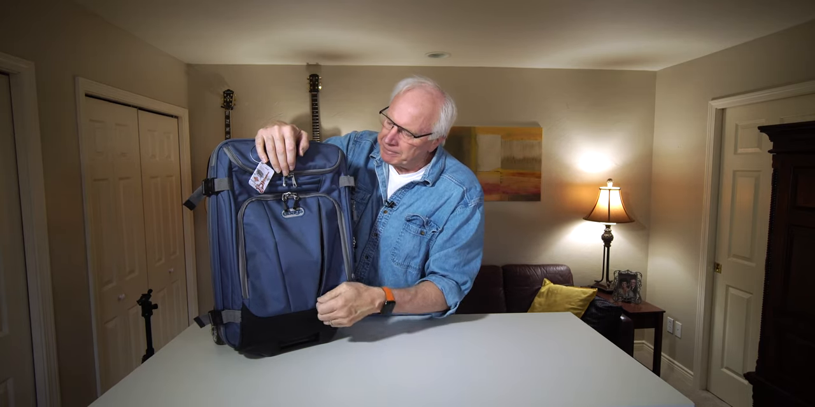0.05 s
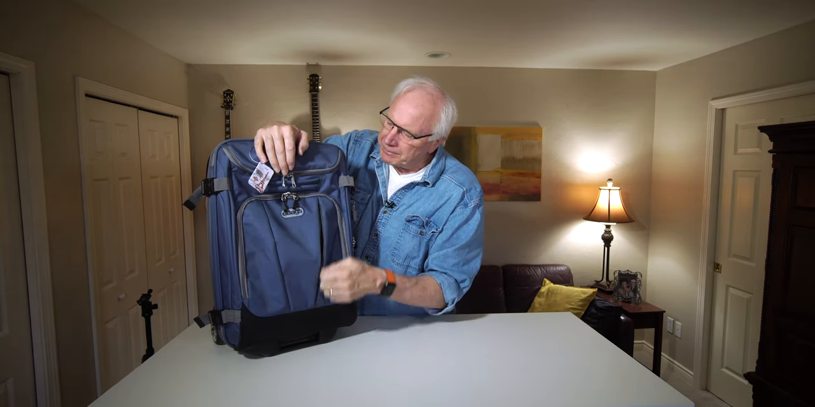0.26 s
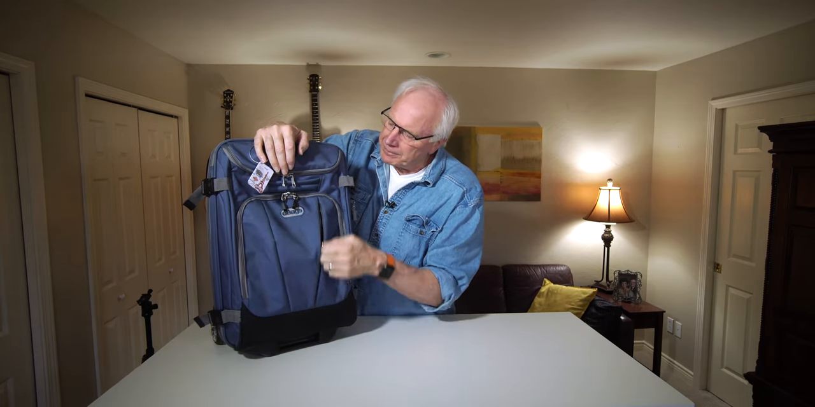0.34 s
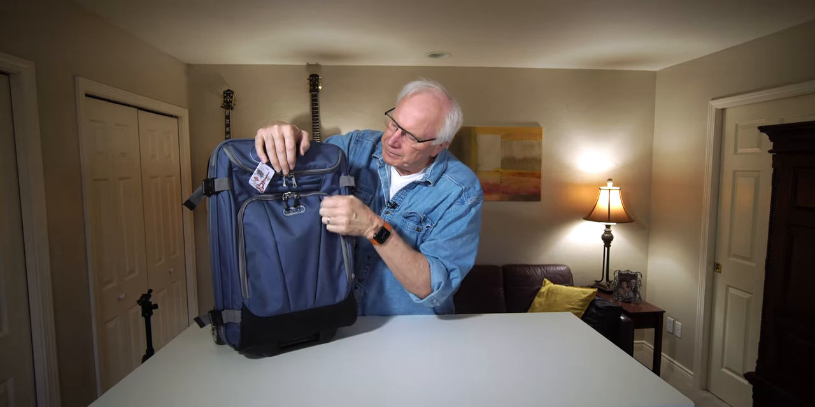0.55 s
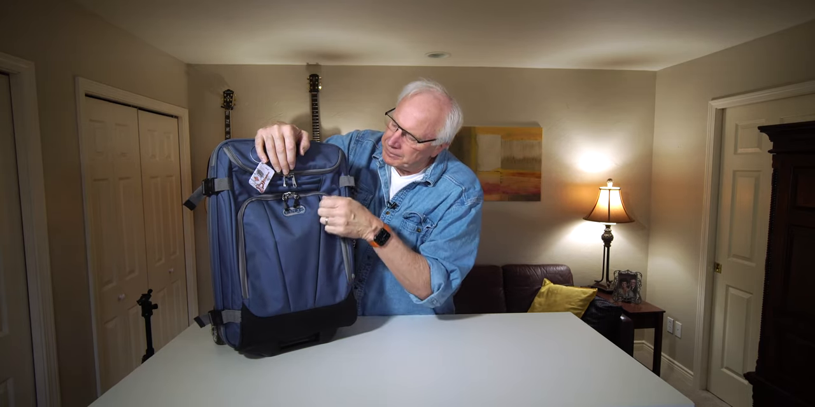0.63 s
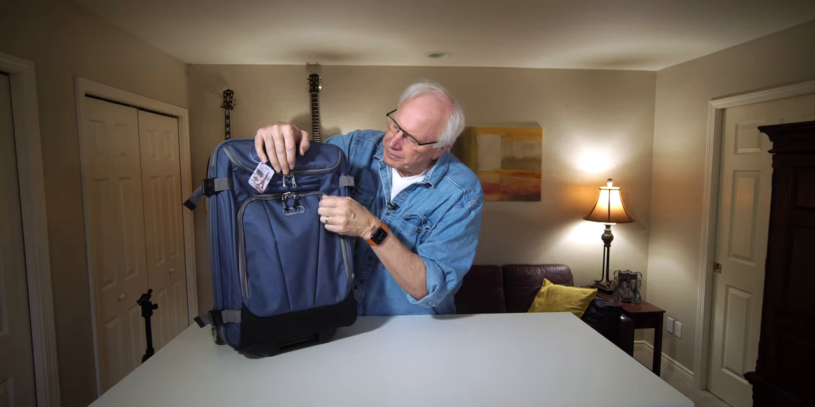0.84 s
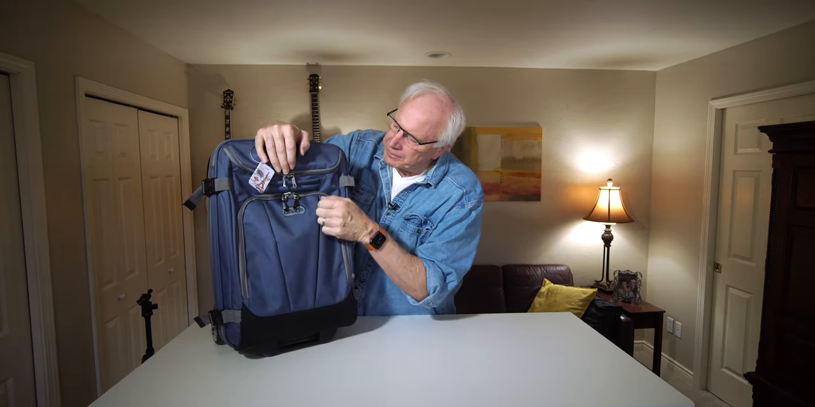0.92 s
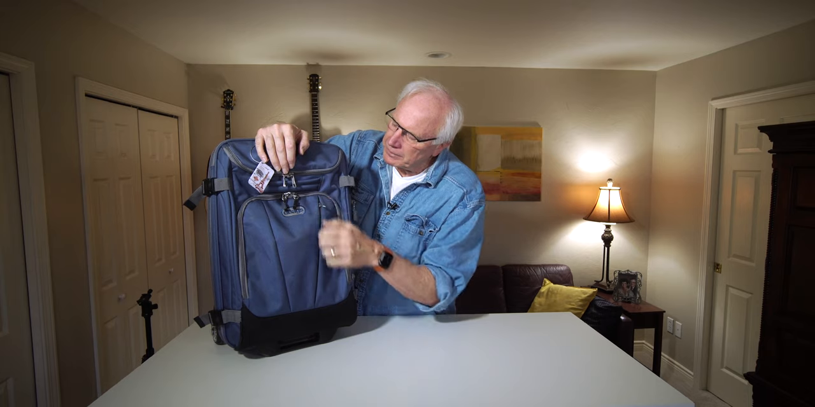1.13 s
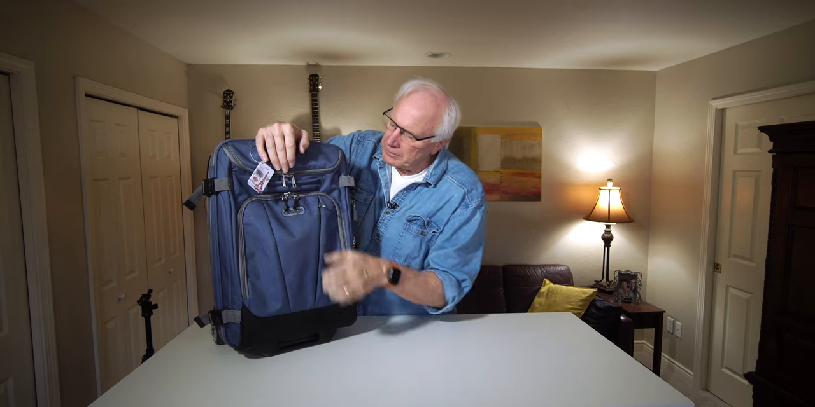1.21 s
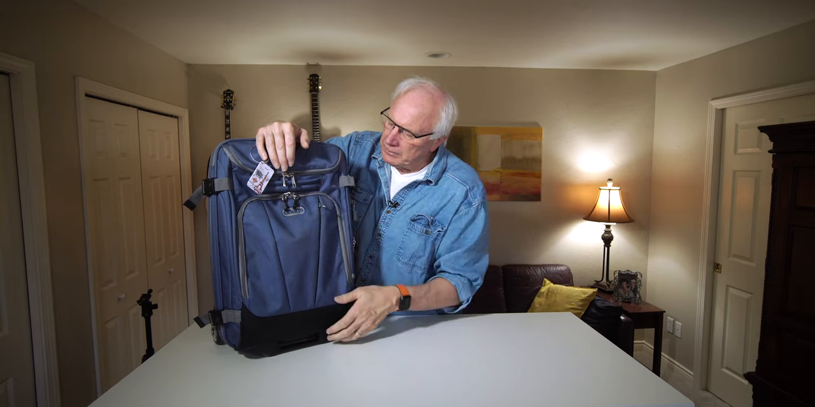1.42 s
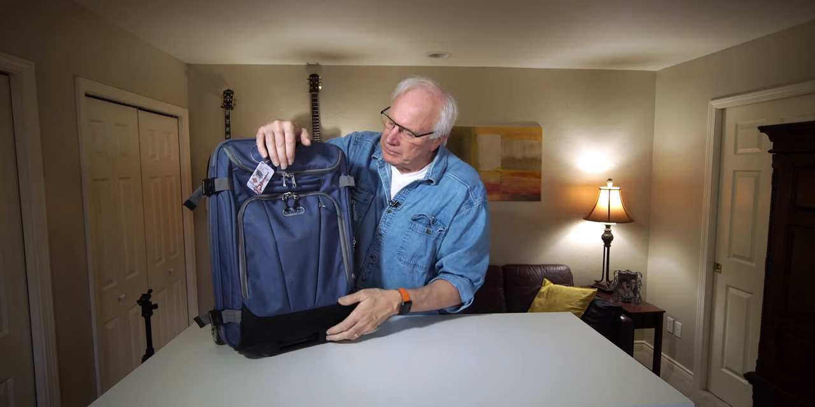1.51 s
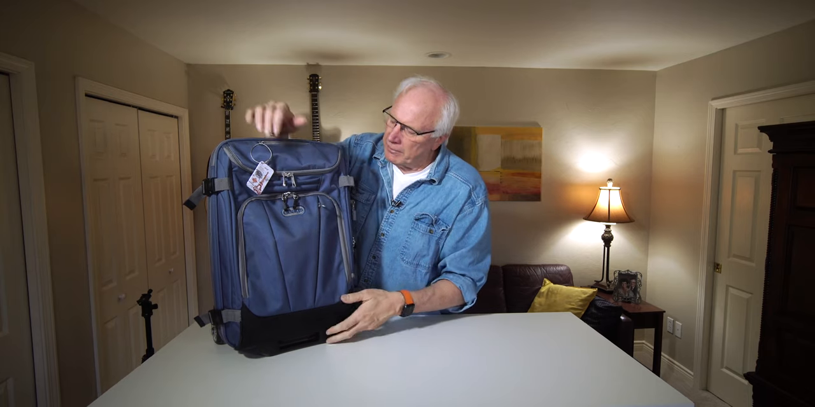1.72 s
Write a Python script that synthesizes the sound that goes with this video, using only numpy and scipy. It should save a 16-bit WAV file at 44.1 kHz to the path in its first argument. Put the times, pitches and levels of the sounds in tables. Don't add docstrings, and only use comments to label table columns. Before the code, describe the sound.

A zipper on a fabric bag: a few separate tooth clicks from 0.15 seconds, then a fast, uneven, hollow buzzing zip from 0.23, slowing and stumbling to a stop near 0.65. A bright pull-tab tick at 0.74 and faint rustling follow. From 1.27 come soft taps, knocks, hand strokes, sleeve rustle and pats until 1.8. Quiet, short-tailed room; close clip-on microphone, low cable thumps, rumble and light hiss.

```python
import sys
import numpy as np
from scipy import signal
from scipy.fft import rfft, irfft, next_fast_len
from scipy.io import wavfile
from scipy.ndimage import uniform_filter1d, map_coordinates

SR = 44100
rng = np.random.default_rng(int(sys.argv[2]) if len(sys.argv) > 2 else 0)


def store_pcm(level_fs):
    pcm = np.round(np.clip(level_fs, -1, 1) * 32767).astype(np.int16)
    wavfile.write(sys.argv[1], SR, np.atleast_2d(pcm).T)


def gain_from_db(level_db):
    decades = np.asarray(level_db, float) / 20
    return 10 ** decades


N = 77175

# (time [s], tooth rate [1/s], pull level [dB], looseness [0-1])
SLIDER_RUN = [
    (.233, 688, -42.5, 0.11),
    (.262, 660, -40, 0.16),
    (.285, 580, -40, 0.11),
    (.322, 770, -40.5, 0.17),
    (.345, 870, -38.5, .1),
    (.45, 837, -41, 0.13),
    (.5, 860, -43, 0.2),
    (.548, 550, -41.5, 0.18),
    (.615, 294, -47, 0.33),
]
STOP_S, STOP_T60_S = .645, .12
# (time [s], length [s], gain [dB], held pitch [Hz], 0 = free)
MODE_LOCKS = [(.235, .021, 5, 685), (.259, .007, 4, 740), (.276, .011, 5, 610), (.29, .012, 4, 590),
              (.304, .005, -10, 0), (.312, .017, 12, 695), (.333, .004, 4, 790), (.347, .003, -10, 0),
              (.352, .004, 7, 885), (.386, .01, 8, 845), (.399, .017, 6, 865), (.417, .003, -10, 0),
              (.422, .004, 5, 870), (.432, .008, 7, 880), (.441, .002, -10, 0), (.445, .008, 3, 860),
              (.479, .006, 3, 885), (.487, .003, -8, 0), (.506, .014, 8, 770), (.522, .017, 8, 730),
              (.545, .012, 4, 530), (.541, .001, -10, 0), (.56, .052, -22, 0), (.614, .011, 3, 310),
              (.629, .011, 5, 285), (.647, .006, 5, 290)]
# (time [s], peak level [dB])
TOOTH_SLIPS = [
    (0.152, -39.5),
    (0.18, -39.5),
    (0.194, -39),
    (0.207, -33.5),
    (0.222, -31),
    (0.235, -41),
]
# (frequency [Hz], level [dB], T60 [s])
SLIP_PARTIALS = [(350, -2.5, 0.047), (668, 4, 0.019), (1346, -15.5, 0.016)]
# (time [s], peak level [dB], pitch [Hz], T60 [s])
STUMBLES = [(.543, -49, 748.3, 0.082), (.566, -44, 492, 0.044), (.572, -43.5, 259, 0.067),
            (.578, -44, 864, 0.027), (.592, -46, 707, 0.066), (.6, -48, 530, 0.055),
            (.603, -50, 353.5, 0.043), (.612, -59, 810, 0.024), (.631, -53, 680, 0.036),
            (.66, -53.5, 350, 0.073), (.694, -53.5, 327, 0.042)]
# (time [s], pitch [Hz], level [dB])
TAPE_FLAP = [
    (.233, 351.8, -55),
    (.285, 294, -47.5),
    (.33, 327.5, -59),
    (.36, 464.6, -49),
    (.4, 436.6, -44),
    (.438, 391.7, -43.5),
    (.465, 382.5, -49),
    (.498, 400, -47),
    (.515, 390, -80),
]
# (centre [Hz], width [Hz], level [dB])
PANEL_MODES = [(359, 48, 3.5), (518, 54, -3), (708, 66, 5), (852, 500, 0.5), (1380, 330, -0.5),
               (1950, 480, -17.5), (3330, 1700, -16.5)]
PANEL_TOP_HZ = 4130
# (frequency [Hz], density [dB/Hz])
SCRAPE_SPECTRUM = [(1500, -2), (2200, -4), (4000, -13), (5200, -10.5), (6900, -7), (8500, -12.5),
                   (12000, -22.5), (16000, -27)]
# (time [s], level [dB])
SCRAPE_EFFORT = [
    (0.14, -73),
    (0.15, -71.5),
    (0.374, -51.5),
    (0.534, -53),
    (0.556, -58),
    (0.626, -59),
    (0.696, -80.5),
    (0.72, -70),
]
# (frequency [Hz], density [dB/Hz])
DRAG_SPECTRUM = [(15, -20), (40, -2), (90, -8), (150, -8), (200, -12), (280, -2), (450, -12), (900, -60)]
SNAG_DB, SNAG_RATE_HZ, KICK_SPREAD_DB = 4, 170, 2
OVERTONE_DB, RATTLE_DB, DRAG_DB = -37, -11.5, -32.5
TWIN_RATIO, TWIN_DB, TWIN_FROM_HZ = 1.08, -6, 780
SLIP_DB, CRACK_DB, CRACK_T60_S, SCRAPE_GATE = -5.5, -23.5, 0.017, 0.2
# (start [s], rise [s], fall [s], level [dB], pitch [Hz])
HAND_SLIDES = [
    (1.466, .01, .12, -63, 1500),
    (1.47, .018, .065, -67.5, 3000),
    (1.52, .04, .06, -64, 1480),
    (1.535, .035, .045, -66, 2780),
]
SLIDE_WIDTH_HZ = 750
# (start [s], rise [s], fall [s], level [dB])
RUSTLES = [
    (.74, 0.02, 0.041, -67),
    (.79, 0.024, 0.17, -69.5),
    (.96, 0.087, 0.056, -69),
    (1.48, 0.18, 0.6, -62),
]
# (frequency [Hz], density [dB/Hz])
CLOTH_SPECTRUM = [(400, -3), (1600, -0.5), (3800, -10), (6500, -1), (8500, -5), (12000, -15.5),
                  (16000, -13)]
# (start [s], rise [s], fall [s], level [dB])
PATS = [
    (1.369, 0.0051, 0.0324, -64),
    (1.266, 0.00175, 0.013, -68),
    (1.8, 0.0023, 0.071, -66),
    (1.598, 0.0146, 0.14, -65),
    (1.733, 0.0026, 0.03, -57),
]
# (frequency [Hz], density [dB/Hz])
PAT_SPECTRUM = [(200, -1.5), (500, 1), (1250, -3.5), (2600, -11), (4000, -23), (7000, -16), (16000, -66)]
# (time [s], peak level [dB], pitch [Hz], T60 [s])
TICKS = [(.026, -63.5, 5860, 0.008), (.736, -40, 6130, 0.0029), (.736, -53, 3650, 0.0038),
         (.736, -59.5, 11200, 0.0011), (.736, -70, 1860, 0.0064), (1.27, -61.5, 6500, 0.0079),
         (1.448, -44.5, 680, 0.01), (1.448, -56.5, 3460, 0.0037), (1.472, -58.5, 3030, 0.0051),
         (1.515, -42, 1090, 0.0035), (1.544, -52.5, 4140, 0.0036), (1.65, -69, 6500, .004),
         (1.738, -61, 1190, 0.067), (1.738, -59, 2530, 0.011), (1.738, -57, 3600, 0.0071),
         (.615, -49.5, 180, 0.13), (.51, -52, 216, 0.042), (.736, -62, 14500, .001),
         (.736, -63, 8260, .002), (1.376, -56.5, 2380, 0.0047), (1.27, -59, 1600, .006),
         (1.27, -61, 603, 0.0065), (1.298, -59, 770, 0.011), (1.378, -59.5, 1000, .005),
         (1.472, -62, 5250, 0.0061), (1.544, -64, 6640, 0.0044), (.527, -49, 1500, 0.043),
         (1.446, -61, 1650, 0.0108), (1.515, -56, 750, 0.014), (1.563, -58.5, 720, 0.017),
         (1.1, -61, 676, 0.027), (.151, -60, 2980, 0.007), (.178, -60, 2940, 0.0027),
         (.193, -44, 2520, 0.0016)]
# (time [s], peak level [dB], pitch [Hz], T60 [s])
THUMPS = [(.058, -60.5, 166, 0.083), (.485, -46, 46.4, 0.18), (.225, -54.5, 147.4, 0.13),
          (.585, -46.5, 130, 0.044), (.75, -51, 29.75, 0.21), (.85, -56.5, 192.5, 0.072),
          (1.04, -48.5, 28.3, 0.15), (1.267, -44, 251, 0.013), (1.355, -45.5, 32.4, 0.17),
          (1.375, -49, 335, .02), (1.47, -49, 209, 0.047), (1.555, -54.5, 72, 0.12),
          (1.62, -47.5, 40, 0.072), (1.72, -57, 40.2, 0.11)]
# (frequency [Hz], T60 [s])
ROOM_T60 = [(150, 0.26), (1000, 0.28), (8000, 0.1)]
ROOM_DB, ROOM_SIDE_DB = -11, -44
# (frequency [Hz], density [dB/Hz])
RUMBLE_SPECTRUM = [(7.1, -25), (12, 11), (29, -2.5), (59, -4.5), (96, -8.5), (140, -9.5), (900, -30.5),
                   (1170, -165), (1980, -120)]
RUMBLE_DB, RUMBLE_LUMP_DB, RUMBLE_SWELL_DB = -63.5, 1, 6
# (frequency [Hz], density [dB/Hz])
HISS_SPECTRUM = [(120, -45), (200, -3.5), (661, -5.5), (1170, -12), (1690, -12.5), (3870, -16.5),
                 (12100, -20.5), (16200, -22.5)]
HISS_DB = -66
# (frequency [Hz], correlation [0-1])
LIKENESS = [(30, 0.993), (120, 0.85), (500, 0.84), (3000, 0.43), (8000, 0.49), (14000, 0.43)]
TOP_HZ = 15740


def unit(x):
    return x / np.sqrt(np.mean(x ** 2) + 1e-20)


def along(points, hz):
    f, v = np.transpose(points)
    return np.interp(np.log(hz + 1), np.log(f + 1), v)


def curves(rows):
    s, *cols = np.transpose(rows)
    return [np.interp(np.arange(N) / SR, s, c) for c in cols]


def wobble(rate_hz):
    return map_coordinates(rng.standard_normal(2000), [np.arange(N) * rate_hz / SR])


def filtered(x, response):
    m = next_fast_len(N + SR // 2)
    return irfft(rfft(x, m) * response(np.fft.rfftfreq(m, 1 / SR)), m)[..., :N]


def coloured(x, spectrum):
    return unit(filtered(x, lambda hz: gain_from_db(along(spectrum, hz))))


def swell(start, rise, fall):
    ramp = np.interp(np.arange(N) / SR, [start, start + rise, start + rise + fall], [0, 1, 0])
    return np.sin(np.pi / 2 * ramp) ** 2


def knocks(rows, attack):
    out, t = np.zeros(N + SR), np.arange(SR // 4) / SR
    for s, db, hz, t60 in rows:
        decay = gain_from_db(db + 6.5 - 60 * t / t60)
        out[round(s * SR):][:len(t)] += decay * np.sin(2 * np.pi * hz * t) * (1 - np.exp(-t * hz / attack))
    return out[:N]


def slider_motion():
    t = np.arange(N) / SR
    rate, pull_db, loose = curves(SLIDER_RUN)
    lock_db, shift = np.zeros(N), np.zeros(N)
    for s, length, db, hz in MODE_LOCKS:
        held = np.clip(np.minimum(t - s, s + length - t) / .0015 + 1, 0, 1)
        lock_db += held * db
        if hz:
            shift += held * (hz - rate)
    rate = rate + shift
    free = gain_from_db(-.85 * lock_db.clip(0))
    turns = np.cumsum(rate * (1 + .6 * loose * free * wobble(220))) / SR
    stop_db = -60 * np.clip(t - STOP_S, 0, 9) / STOP_T60_S
    pull = gain_from_db(pull_db + stop_db) * np.clip((t - SLIDER_RUN[0][0]) / 0.00086, 0, 1)
    return rate, turns, pull, loose, lock_db, free


def tooth_push(rate, turns, loose, lock_db, free):
    t = np.arange(N) / SR
    overtone = gain_from_db(OVERTONE_DB + lock_db + 30 * (t - .4)) * np.sin(4 * np.pi * turns)
    uneven = gain_from_db(lock_db + SNAG_DB * free * wobble(SNAG_RATE_HZ) - 10 * loose)
    first_coil = uneven * (np.sin(2 * np.pi * turns) + overtone)
    twin_turns = np.cumsum(TWIN_RATIO * rate * (1 + .05 * wobble(120))) / SR
    twin_gain = gain_from_db(TWIN_DB + 2.8 * wobble(109.8)) * np.clip((rate - TWIN_FROM_HZ) / 80, 0, 1)
    return first_coil + twin_gain * np.sin(2 * np.pi * twin_turns)


def panel(f):
    modes = sum((-1) ** k * gain_from_db(db) * 1j * f * w / (c * c - f * f + 1j * f * w)
                for k, (c, w, db) in enumerate(PANEL_MODES))
    return modes / (1 + 1j * f / PANEL_TOP_HZ) ** 2


def tooth_rattle(rate, turns, pull, loose):
    at = np.flatnonzero(np.diff(np.floor(turns)))
    chance = rng.standard_normal((2000, 2))[:len(at)]
    at = np.clip(at + (0.55 * chance[:, 0] * SR / rate[at]).astype(int), 0, N - 1)
    kicks = np.bincount(at, gain_from_db(KICK_SPREAD_DB * chance[:, 1]), N)
    kicks = kicks - uniform_filter1d(kicks, size=1500)
    norm = np.std(filtered(kicks, panel)[round(.2 * SR):round(.6 * SR)])
    force = pull * gain_from_db(RATTLE_DB + 16.6 * loose + 0.92 * wobble(38.85))
    return filtered(kicks * force / norm, panel)


def tape_flap():
    t = np.arange(N) / SR
    hz, db = curves(TAPE_FLAP)
    turns = np.cumsum(hz * (1 + .03 * wobble(150))) / SR
    on = (t > TAPE_FLAP[0][0]) * (t < TAPE_FLAP[-1][0])
    return gain_from_db(db + 1.5 * wobble(70)) * np.sin(2 * np.pi * turns) * on


def tooth_slips():
    return knocks([(s, db + SLIP_DB + part_db, hz, t60)
                   for s, db in TOOTH_SLIPS for hz, part_db, t60 in SLIP_PARTIALS], 1.0)


def tape_scrape(turns):
    t = np.arange(N) / SR
    [effort_db] = curves(SCRAPE_EFFORT)
    gate = 1 + SCRAPE_GATE * np.cos(np.pi * turns)
    scrape = coloured(rng.standard_normal(N) * gate * gain_from_db(1.5 * wobble(250)), SCRAPE_SPECTRUM)
    effort = gain_from_db(effort_db + 1.0) * (t > .15) * (t < .72)
    cracks = sum(gain_from_db(min(db, -36) + CRACK_DB - 60 * np.clip(t - s, 0, 1) / CRACK_T60_S) * (t >= s)
                 for s, db in TOOTH_SLIPS)
    return scrape * (effort + cracks)


def bag_drag(pull, loose):
    return gain_from_db(DRAG_DB + 40 * loose + 2 * wobble(40)) * pull * coloured(rng.standard_normal(N), DRAG_SPECTRUM)


def zipper():
    rate, turns, pull, loose, lock_db, free = slider_motion()
    teeth = tooth_push(rate, turns, loose, lock_db, free) * pull + tooth_rattle(rate, turns, pull, loose)
    single_teeth = tooth_slips() + knocks(STUMBLES, 0.7)
    return teeth + single_teeth + tape_flap() + tape_scrape(turns) + bag_drag(pull, loose)


def hand_slides():
    grain_gain = gain_from_db(0.67 * wobble(200))
    out = np.zeros(N)
    for s, rise, fall, db, hz in HAND_SLIDES:
        def band(f):
            return (1j * f * SLIDE_WIDTH_HZ / (hz * hz - f * f + 1j * f * SLIDE_WIDTH_HZ)) ** 2
        grain = rng.standard_normal(N) * grain_gain
        out += gain_from_db(db) * swell(s, rise, fall) * unit(filtered(grain, band))
    return out


def rustles():
    grain_gain = gain_from_db(1.6 * wobble(300) + .4 * wobble(30))
    out = np.zeros(N)
    for spectrum, rows in ((CLOTH_SPECTRUM, RUSTLES), (PAT_SPECTRUM, PATS)):
        envelope = sum(gain_from_db(db) * swell(s, rise, fall) for s, rise, fall, db in rows)
        out += coloured(rng.standard_normal(N) * grain_gain, spectrum) * envelope
    return out


def ticks():
    return knocks(TICKS, 0.6)


def thumps():
    return knocks(THUMPS, 0.18)


def room(x):
    hz, t, z = signal.stft(rng.standard_normal((2, SR // 2)), SR, nperseg=256)
    tail = signal.istft(z * gain_from_db(-60 * t / along(ROOM_T60, hz)[:, None]), SR, nperseg=256)[1]
    tail = tail / np.linalg.norm(tail[0])
    delayed = np.pad(x, (200, 0))[None]
    mid, side = signal.fftconvolve(delayed, tail, axes=1)[:, :N]
    return gain_from_db(ROOM_DB) * mid + gain_from_db(ROOM_SIDE_DB) * side * [[1], [-1]]


def stereo(spectrum):
    def mid_side(hz):
        turn = np.arccos(np.clip(along(LIKENESS, hz), -1, 1)) / 2
        return gain_from_db(along(spectrum, hz)) * [np.cos(turn), np.sin(turn)]
    mid, side = filtered(rng.standard_normal((2, N)), mid_side)
    return unit(np.array([mid + side, mid - side]))


def rumble():
    lumps = gain_from_db(RUMBLE_LUMP_DB * wobble(25.26) + RUMBLE_SWELL_DB * np.arange(N) / N)
    return gain_from_db(RUMBLE_DB) * lumps * stereo([(7.8, -67)] + RUMBLE_SPECTRUM + [(3000, -43.5)])


def hiss():
    return gain_from_db(HISS_DB) * stereo([(60, -1.0)] + HISS_SPECTRUM)


def scene():
    near = zipper() + hand_slides() + rustles() + ticks()
    return near + room(near) + thumps() + rumble() + hiss()


def top_cut(x):
    return signal.sosfilt(signal.butter(12, 16380, fs=SR, output="sos"), x)


def record(dry):
    mix = filtered(dry, lambda hz: np.where(hz < TOP_HZ, 1, .05))
    return top_cut(mix)


dry = scene()
out = record(dry)
store_pcm(out)
```